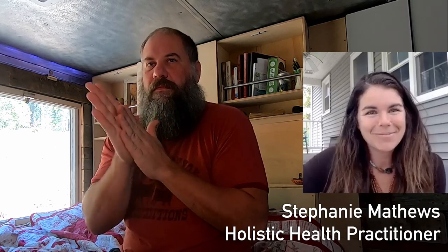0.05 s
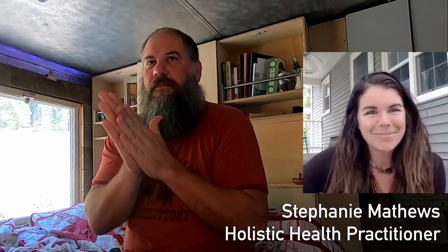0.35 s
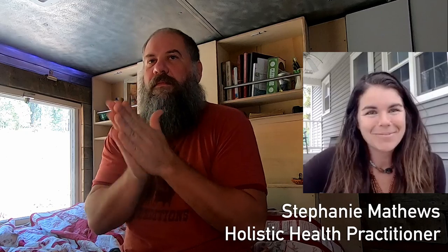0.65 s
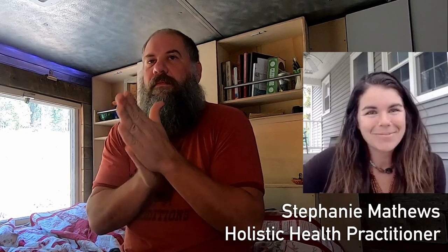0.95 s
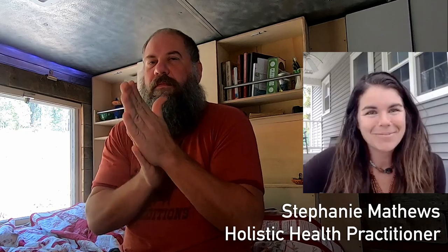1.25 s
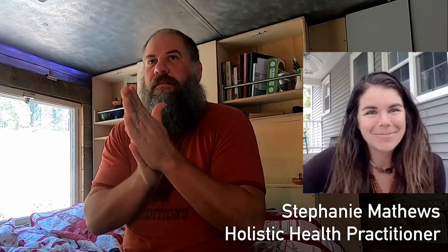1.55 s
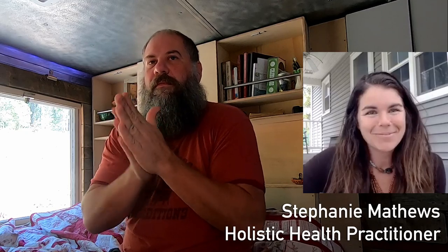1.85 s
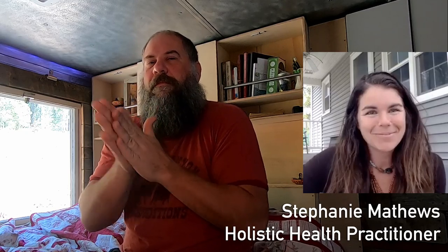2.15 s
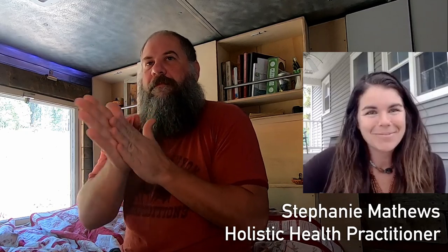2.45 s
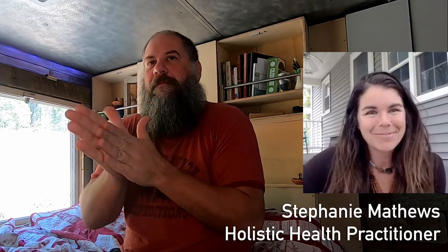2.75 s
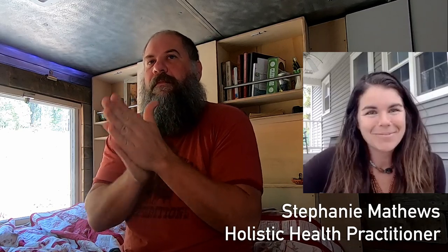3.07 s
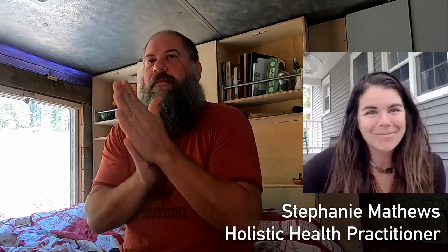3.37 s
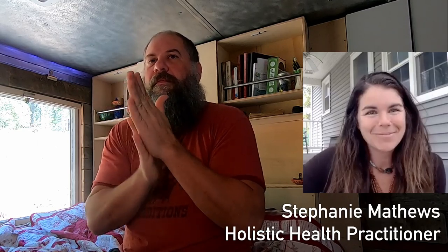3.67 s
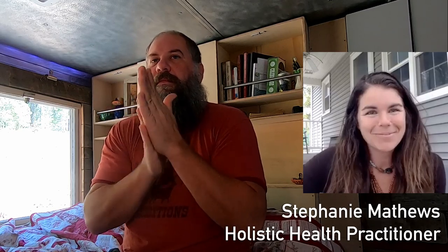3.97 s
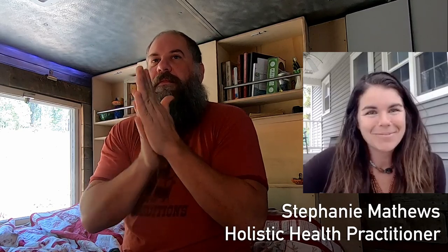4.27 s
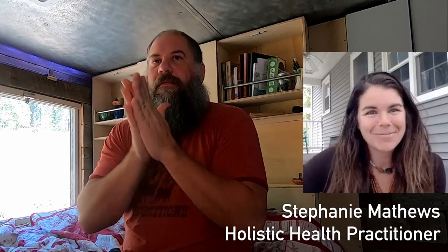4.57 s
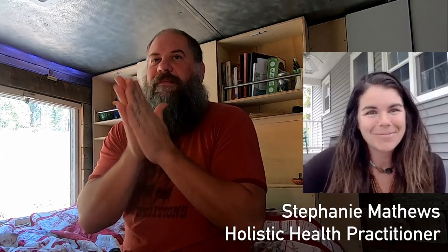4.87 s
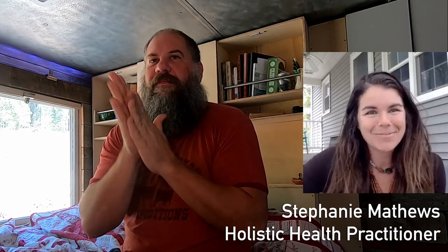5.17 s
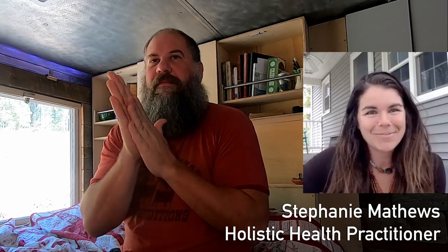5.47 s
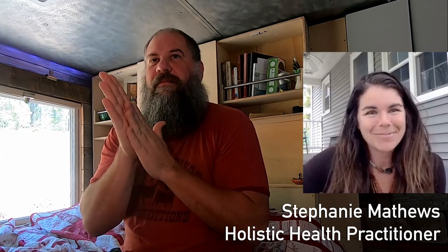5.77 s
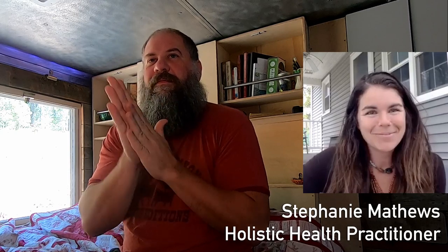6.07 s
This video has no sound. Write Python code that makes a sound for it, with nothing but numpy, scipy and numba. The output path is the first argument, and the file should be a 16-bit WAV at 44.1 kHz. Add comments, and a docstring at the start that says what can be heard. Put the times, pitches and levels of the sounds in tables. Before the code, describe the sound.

Two dry palms rub quickly back and forth in an even, hissing rhythm in a quiet small room.

```python
"""Over low room tone, two dry palms rub to and fro in a small room, about seven strokes a second.
From the start, countless tiny slips of skin hiss; air pockets between the hands ring with the hiss
and change size as they slide; the fleshy pads brush late in each pull. From 1.6 s the pads also
bump softly now and then, and a faint background hum swells and fades. At 3.1, 3.7 and 5.7 s
the cupped palms ring briefly on one note."""
import sys
import numpy as np
from scipy import signal
from scipy.fft import rfft, irfft, next_fast_len
from scipy.io import wavfile
from numba import njit

SR = 44100
rng = np.random.default_rng(int(sys.argv[2]) if len(sys.argv) > 2 else 0)


def master_out(mix):
    """Clip the mix to full scale and print it as 16-bit PCM to the path in sys.argv[1]."""
    frames = np.transpose(np.atleast_2d(mix))
    ceiling = np.clip(frames, -1, 1)
    pcm = np.round(ceiling * 32767).astype(np.int16)
    wavfile.write(sys.argv[1], SR, pcm)


N = 274125
TIME_S = np.arange(N) / SR

# room tone spectrum: freq_hz, relative_db
ROOM_SPECTRUM = [(8, 9), (20, 3.5), (40, -2), (70, -6.5), (110, -9.5), (200, -12.5), (350, -13),
                 (600, -15.5), (850, -21), (1200, -14), (2500, -20.5), (8000, -28.5), (16000, -27.5)]
# steady whine: pitch_hz, width_hz, level_db
WHINE_BAND = (848, 28, -68)
# hum resonance: pitch_hz, width_hz
HUM_BAND = (724, 300)
# hum swells: time_s, level_db
HUM_SWELLS = [(0, -76), (2.1, -62), (2.4, -57), (3.4, -64), (4.0, -58), (4.6, -72), (5.15, -53), (5.9, -68),
              (6.2, -56)]
# strokes, pull first, then alternating: start_s, strength_db, pocket_hz (used as ratio to its mean)
HAND_STROKES = [(-0.066, -33, 2930), (0.07, -31.5, 2930), (0.2, -32.5, 3340), (0.341, -32.0, 3080),
                (0.476, -32.5, 3060), (0.609, -30, 3260), (0.746, -32, 3280), (0.883, -30.5, 3300),
                (1.018, -32, 3200), (1.146, -31.4, 2950), (1.282, -33, 3050), (1.416, -31, 2950),
                (1.552, -32.5, 3260), (1.688, -33, 3280), (1.825, -32.5, 3170), (1.959, -33.4, 3460),
                (2.096, -32.5, 2780), (2.227, -31, 3300), (2.359, -32, 3040), (2.496, -35, 2720),
                (2.624, -32.5, 3020), (2.755, -34.5, 3600), (2.887, -33, 2950), (3.022, -32.5, 3000),
                (3.16, -32.3, 2880), (3.297, -34, 2700), (3.435, -33.5, 2780), (3.57, -35, 3520),
                (3.712, -35.6, 2920), (3.848, -34, 3500), (3.995, -35.5, 3000), (4.135, -32.5, 3500),
                (4.269, -34.5, 3200), (4.407, -35, 3600), (4.55, -36.0, 3250), (4.687, -32.5, 2940),
                (4.829, -32.5, 3090), (4.971, -32, 2860), (5.11, -34.9, 3360), (5.251, -32.0, 3060),
                (5.394, -33.0, 3250), (5.529, -33, 3220), (5.664, -37, 3200), (5.807, -32, 3960),
                (5.948, -35.8, 3220), (6.089, -33, 3640), (6.228, -41, 3200)]
# push, slow to gather speed: rise_share, brake_share, start_db, full_db, end_db
PUSH_SWELL = (0.5526, 0.3379, -20, 3, -25)
# pull, quick to gather speed: rise_share, brake_share, start_db, full_db, end_db
PULL_SWELL = (0.3355, 0.4837, -20.5, 2.5, -23)
# sliding skin spectrum: freq_hz, relative_db
SKIN_SPECTRUM = [(150, -20), (400, -16), (800, -20.5), (1100, -17.5), (1500, -9), (2200, -4), (3200, -0.65),
                 (5400, 1), (7000, -1.5), (8700, 2.5), (10000, -6.5), (13000, -7), (15800, -12.5)]
# pockets between the palms: place_strokes, sigma_strokes, pitch_hz, glide_oct_per_stroke, width_hz, gain_db
AIR_POCKETS = [(.17, 0.076, 1584, 0.2, 130, -16), (.37, 0.055, 1830, 5, 220, -17),
               (0.556, 0.061, 3040, -1, 420, -1.2), (.55, 0.051, 1340, 4.5, 200, -18.5),
               (.67, 0.14, 1956, -0.7, 209, -11.5), (.74, 0.019, 990, 3, 350, -23),
               (1.11, 0.058, 1950, 0.5, 302, -18.5), (1.12, 0.041, 1160, 8, 350, -21),
               (1.25, 0.11, 3880, -0.7, 695, -3.5), (1.36, 0.044, 1620, 1.5, 300, -11),
               (1.489, 0.034, 3090, -2, 300, -1.4), (1.56, 0.074, 1240, 1, 160, -17.5),
               (1.66, 0.053, 2580, 0.5, 260, -10), (1.78, 0.09, 1630, 0.9, 140, -16)]
# tightness of the palms' seal: time_s, gain_db
PALM_SEAL = [(0, -1), (1.0, -0.5), (1.8, -.5), (2.3, -3), (2.7, -0.5), (3.4, 1.3), (3.9, -0.5),
             (4.45, -5.5), (5.0, -2), (5.6, -3.5), (6.2, -3)]
# pads brushing: place_strokes, sigma_strokes, pitch_hz, width_hz, gain_db
PAD_BRUSH = (1.76, 0.09, 432, 420, -22)
# pads bumping: start_s, peak_db, pitch_hz, decay_s
PAD_BUMPS = [(1.598, -43, 420, 0.0047), (1.869, -47, 400, 0.0063), (2.414, -46.5, 434, 0.0056),
             (3.121, -37.5, 940, 0.0023), (3.397, -38.5, 950, 0.002), (4.880, -47, 520, 0.004),
             (5.154, -42.5, 497, 0.0066), (5.696, -45.5, 300, .0083), (5.725, -39.5, 338, 0.0064),
             (5.815, -45.5, 320, 0.0088), (6.0, -44, 400, 0.0032)]
# notes of the cupped palms: centre_s, sigma_s, pitch_hz, peak_db
PALM_HOOTS = [(3.075, 0.0053, 1800, -37.5), (3.664, 0.0092, 1770, -41), (5.7, 0.012, 2050, -37)]
# reflections off walls and shelves: delay_s, gain_db
WALL_ECHOES = [(.0023, -32), (.0041, -20.5), (.0067, -20)]


def from_db(db):
    """Decibels to gain."""
    return 10 ** (np.asarray(db) / 20)


def unit_rms(x):
    """Scale to rms 1."""
    return x / np.sqrt(np.mean(x ** 2) + 1e-20)


def coloured(x, spectrum):
    """Apply a smooth spectrum; rms 1."""
    size = next_fast_len(N + 4096)
    hz, db = np.transpose(spectrum)
    bins_hz = np.maximum(np.fft.rfftfreq(size, 1 / SR), 1)
    gain = from_db(np.interp(np.log(bins_hz), np.log(hz), db))
    return unit_rms(irfft(rfft(x, size) * gain, size)[:N])


def low_pass(x, hz, order=2):
    """Butterworth low-pass."""
    return signal.sosfilt(signal.butter(order, hz, fs=SR, output="sos"), x)


def flutter(hz):
    """Random wavering up to about hz; rms 1."""
    return unit_rms(low_pass(rng.standard_normal(2 * N), hz)[N:])


def narrow_noise(hz, width_hz):
    """Noise in one resonance, upper skirt trimmed; rms 1."""
    ringing = signal.lfilter(*signal.iirpeak(hz, hz / width_hz, fs=SR), rng.standard_normal(N))
    return unit_rms(low_pass(ringing, 2 * hz, order=3))


def gaussian(offset, sigma):
    """Bell-shaped envelope; peak 1."""
    return np.exp(-.5 * (offset / sigma) ** 2)


@njit
def resonate(x, pitch_hz, width_hz):
    """Two-pole resonance with moving pitch."""
    radius = np.exp(-np.pi * width_hz / SR)
    out, state = np.zeros(len(x)), 0j
    for i in range(len(x)):
        state = state * radius * np.exp(2j * np.pi * pitch_hz[i] / SR) + x[i]
        out[i] = state.real
    return out


def background(tone_db=-48):
    """Low room tone, a faint steady whine and a slowly swelling hum."""
    hum = from_db(np.interp(TIME_S, *np.transpose(HUM_SWELLS))) * narrow_noise(*HUM_BAND)
    tone = from_db(tone_db) * coloured(rng.standard_normal(N), ROOM_SPECTRUM)
    hz, width_hz, db = WHINE_BAND
    return tone + from_db(db) * narrow_noise(hz, width_hz) + hum


def hand_motion(ease_strokes=0.37):
    """Place in the cycle (push 0-1, pull 1-2); strength and pocket pitch, eased across the turns."""
    start_s, strength_db, pocket_hz = np.transpose(HAND_STROKES)
    index = np.arange(len(start_s))
    strokes_done = np.interp(TIME_S, start_s, index)
    hold_edges = (index[:, None] + [ease_strokes, 1 - ease_strokes]).ravel()
    held = lambda column: np.interp(strokes_done, hold_edges, np.repeat(column, 2))
    return (strokes_done + 1) % 2, held(strength_db), held(pocket_hz)


def swell_db(place, shape):
    """Level along a stroke: the hands speed up, slide and brake."""
    rise, brake, start_db, full_db, end_db = shape
    early = np.maximum(1 - place / rise, 0)
    late = np.maximum(1 - (1 - place) / brake, 0)
    return full_db + (start_db - full_db) * early ** 1.93 + (end_db - full_db) * late ** 2.22


def skin_slips(rate_per_s=5000, spread_db=0.9, bed_db=5.0):
    """Skin ridges catch and let go: uneven clicks on a bed of finer ones."""
    sizes = from_db(spread_db * np.minimum(rng.exponential(1, N), 4)) * rng.choice([-1, 1], N)
    clicks = sizes * (rng.random(N) < rate_per_s / SR)
    return unit_rms(unit_rms(clicks) + from_db(bed_db) * rng.standard_normal(N))


def friction(cycle, cupping_db, drift_db=0.5, flicker_db=0.8):
    """Sliding skin hisses: louder with speed, its colour drifting as the contact shifts."""
    speed_db = np.where(cycle < 1, swell_db(cycle, PUSH_SWELL), swell_db(cycle - 1, PULL_SWELL))
    hiss = coloured(skin_slips(), SKIN_SPECTRUM)
    below = lambda hz: signal.sosfiltfilt(signal.butter(3, hz, fs=SR, output="sos"), hiss)
    body, warm, dull = below(2200), below(3800), below(7000)
    bands = [(body, cupping_db - .34), (warm - body, -.9), (dull - warm, 0), (hiss - dull, -.6)]
    out = np.zeros(N)
    for band, db in bands:
        out += band * from_db(db + drift_db * flutter(hz=10.5) + flicker_db * flutter(hz=99))
    return from_db(speed_db) * out


def air_pockets(cycle, cupping_db, pocket_hz, wander_oct=0.064, uneven_db=1.15, small_above_hz=2300):
    """Each pocket rings while open, a little differently on every pass."""
    seal_db = np.interp(TIME_S, *np.transpose(PALM_SEAL))
    out = np.zeros(N)
    for place, sigma, hz, glide, width_hz, db in AIR_POCKETS:
        offset = (cycle - place + 1) % 2 - 1
        pitch_hz = hz * 2 ** (glide * offset + wander_oct * flutter(hz=2.26))
        if hz > small_above_hz:
            pitch_hz *= pocket_hz / np.mean(pocket_hz)
            gain_db = db + seal_db
        else:
            gain_db = db + 0.97 * cupping_db
        ringing = resonate(rng.standard_normal(N), pitch_hz, width_hz)
        skirt_filter = signal.butter(1, [hz / 2, hz * 2], "band", fs=SR, output="sos")
        ringing = unit_rms(signal.sosfilt(skirt_filter, ringing))
        out += ringing * from_db(gain_db + uneven_db * flutter(hz=6.9)) * gaussian(offset, sigma)
    return out


def pad_brush(cycle):
    """The pads brush past each other: a soft puff late in each pull."""
    place, sigma, hz, width_hz, db = PAD_BRUSH
    return from_db(db) * narrow_noise(hz, width_hz) * gaussian(cycle - place, sigma)


def pad_bumps():
    """Soft flesh meets: short dull puffs."""
    out = np.zeros(N)
    for start_s, peak_db, hz, decay_s in PAD_BUMPS:
        age = np.maximum(TIME_S - start_s, 0) / decay_s
        envelope = np.sqrt(2 * age) * np.exp(.5 - np.minimum(age, 20))
        out += from_db(peak_db) * envelope * narrow_noise(hz, width_hz=hz)
    return out


def palm_hoots(width_hz=70):
    """A well sealed hollow rings briefly on one note."""
    return sum(from_db(db) * narrow_noise(hz, width_hz) * gaussian(TIME_S - centre_s, sigma_s)
               for centre_s, sigma_s, hz, db in PALM_HOOTS)


def room(x, t60_s=0.27, tail_db=-15, damping_hz=6000):
    """Close reflections and a short tail dulled by soft furnishings."""
    age_s = TIME_S[:SR // 2]
    tail = rng.standard_normal(len(age_s)) * from_db(-60 * age_s / t60_s) * (age_s > .005)
    response = low_pass(tail * from_db(tail_db) / np.linalg.norm(tail), damping_hz, order=1)
    response[0] = 1  # direct sound
    for delay_s, db in WALL_ECHOES:
        response[round(delay_s * SR)] += from_db(db)
    return signal.fftconvolve(x, response)[:N]


def scene(usual_db=-33.5, flutter_db=0.88, waver_db=0.7):
    """Hands rubbing with a wavering grip, in the room, over the background."""
    cycle, strength_db, pocket_hz = hand_motion()
    cupping_db = 0.74 * (usual_db - strength_db)  # lighter stroke, hollower hands
    grip = from_db(strength_db + flutter_db * flutter(hz=300) + waver_db * flutter(hz=40))
    rubbing = friction(cycle, cupping_db) + air_pockets(cycle, cupping_db, pocket_hz) + pad_brush(cycle)
    hands = grip * rubbing + pad_bumps() + palm_hoots()
    return (room(hands) + background())[None]


def record(dry, cutoff_hz=15900):
    """Steep elliptic low-pass."""
    return signal.sosfilt(signal.ellip(12, .1, 90, cutoff_hz, fs=SR, output="sos"), dry)


dry = scene()
out = record(dry)
master_out(out)
```